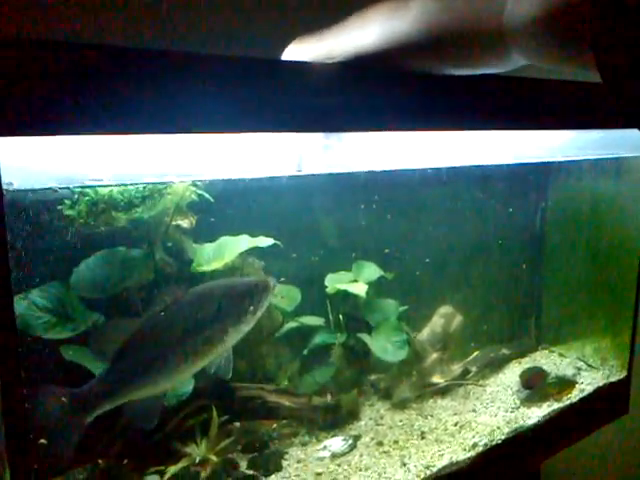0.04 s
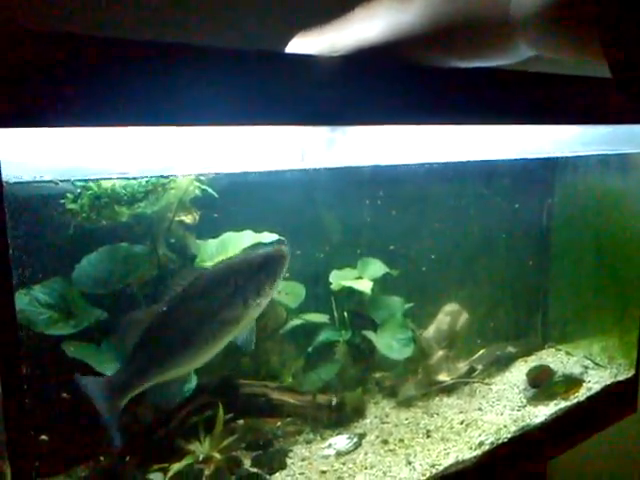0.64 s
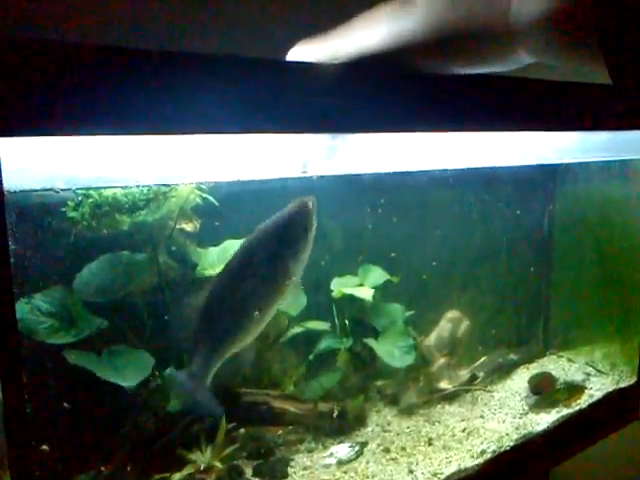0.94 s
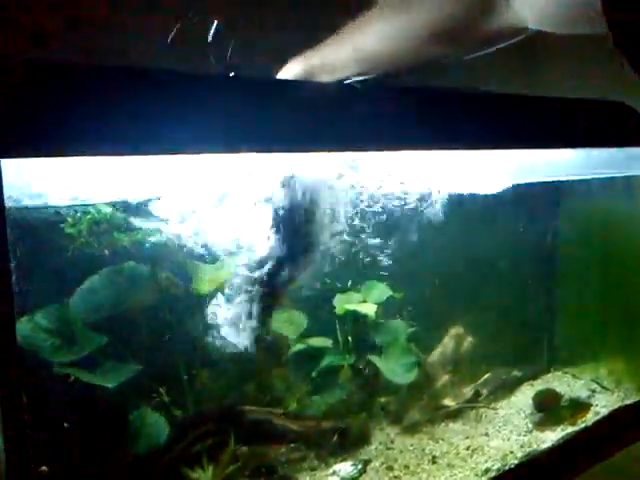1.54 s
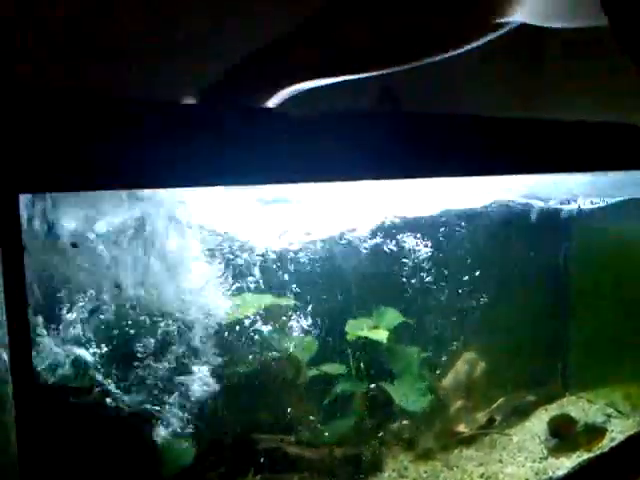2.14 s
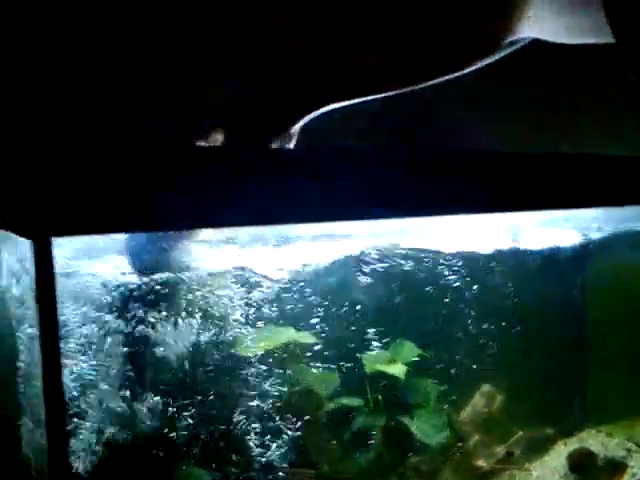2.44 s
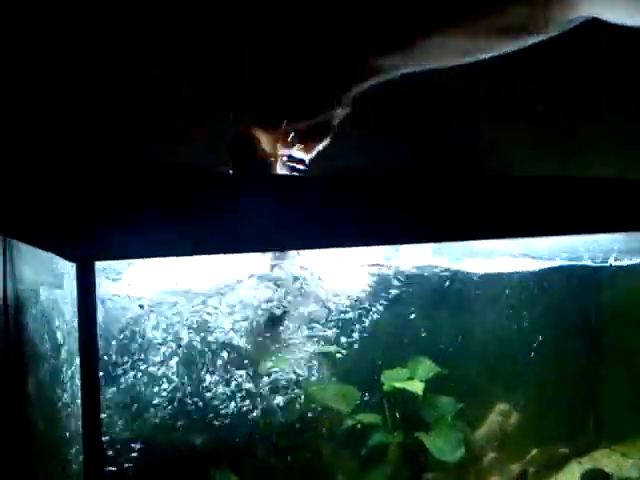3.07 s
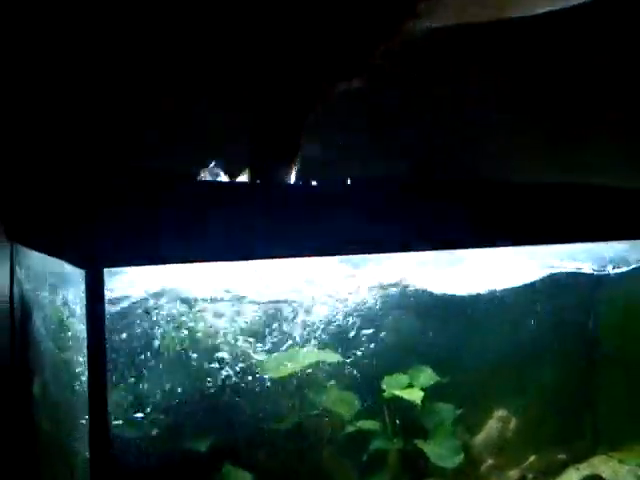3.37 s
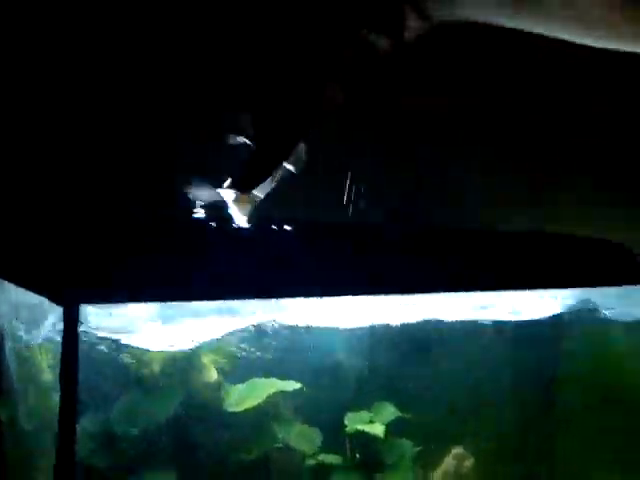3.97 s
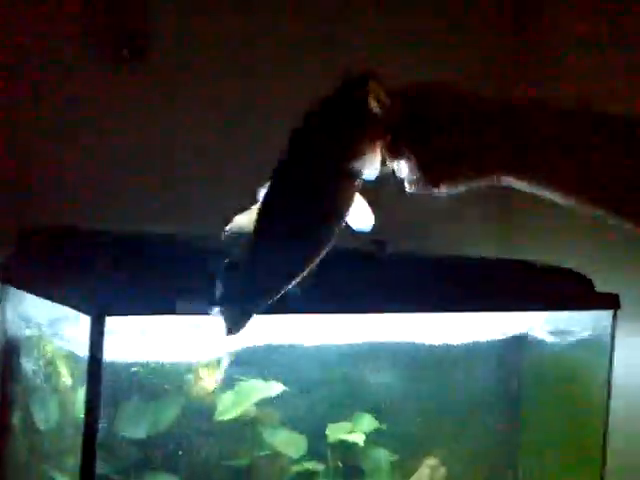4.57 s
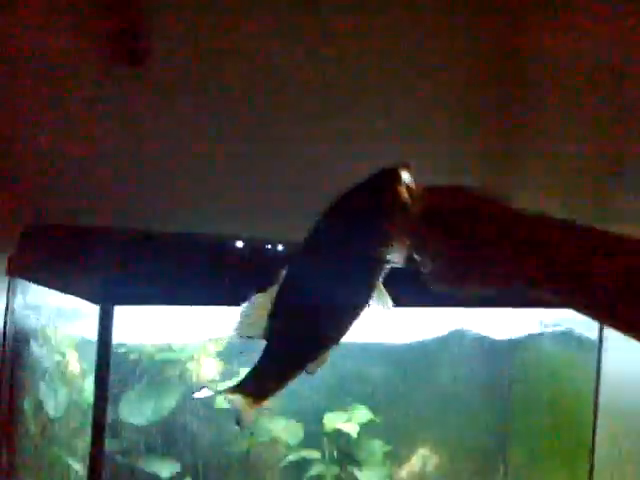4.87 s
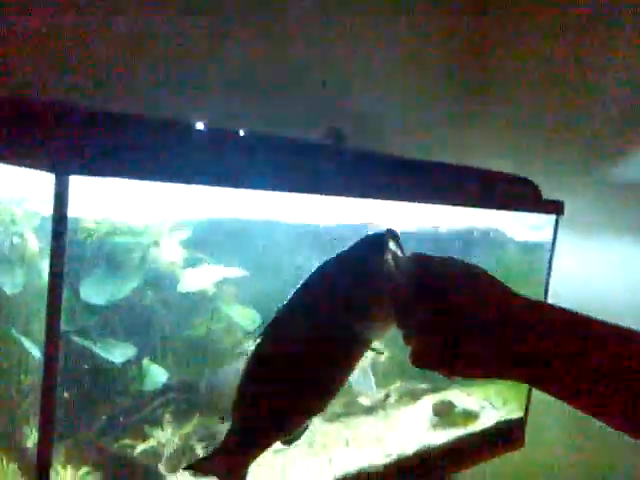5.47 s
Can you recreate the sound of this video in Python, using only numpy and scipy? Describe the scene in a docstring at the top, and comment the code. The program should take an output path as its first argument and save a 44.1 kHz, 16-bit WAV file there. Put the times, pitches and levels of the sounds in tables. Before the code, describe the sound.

A faint aquarium trickle and low room noise are broken by a big fish thrashing at the surface as a hand grabs it. Two loud bouts of slapping splashes throw spray, with deep booming gurgles underneath. The water then settles, and drops plop into the gently sloshing tank as the fish is lifted out. It all happens in a small room, heard through a dull, narrow-band microphone.

```python
"""A big fish, grabbed by hand, thrashes at the surface of an indoor aquarium in two bouts.
Each tail slap throws spray and stirs the tank; the air driven under booms and gurgles.
The water settles, then runs and drips off the lifted fish. A faint trickle and room noise
go on throughout, all heard through a narrow-band microphone."""
import sys
import numpy as np
from scipy import signal
from scipy.fft import rfft, irfft, next_fast_len
from scipy.io import wavfile

SR = 44100
rng = np.random.default_rng(int(sys.argv[2]) if len(sys.argv) > 2 else 0)


def dump_mix(stems):
    """Bounce the given channels to the path in sys.argv[1] as a 16-bit WAV at rate SR."""
    frames = np.atleast_2d(stems).T  # one column per channel
    limited = np.clip(frames, -1, 1)  # hard clip at full scale
    pcm = np.round(limited * 32767).astype(np.int16)
    wavfile.write(sys.argv[1], SR, pcm)


N = 251811


def amp(db):
    """Decibels to gain."""
    return 10 ** (np.asarray(db) / 20)


def unit(x):
    """Scale to rms 1."""
    return x / np.sqrt(np.mean(x ** 2) + 1e-20)


def add(track, start_s, sound):
    """Mix a sound into a track."""
    start = max(0, round(start_s * SR))
    track[start:start + len(sound)] += sound[:len(track) - start]


def filtered(x, gain):
    """Apply a gain given as a function of Hz."""
    size = next_fast_len(len(x) + 8192)
    hz = np.fft.rfftfreq(size, 1 / SR) + 1
    return irfft(rfft(x, size) * gain(hz), size)[:len(x)]


def coloured(x, points):
    """Filter by (Hz, dB) points joined on a log axis."""
    hz, db = np.transpose(points)
    return filtered(x, lambda f: amp(np.interp(np.log(f), np.log(hz), db)))


def plateau(start_s, stop_s, rise_db_per_s, fall_db_per_s):
    """Gain 1 between two times, fading on both sides."""
    t = np.arange(N) / SR
    return amp(-rise_db_per_s * np.maximum(start_s - t, 0) - fall_db_per_s * np.maximum(t - stop_s, 0))


def swell_decay(t, attack_s, t60_s):
    """Quick swell, exponential decay."""
    return (1 - np.exp(-t / attack_s)) * np.exp(-np.log(1000) * t / t60_s)


def ring(t, hz, t60_s, rise, attack_s):
    """Damped sine of a bubble, climbing in pitch as it nears the surface."""
    return np.sin(2 * np.pi * hz * t * (1 + rise * t / t60_s / 2)) * swell_decay(t, attack_s, t60_s)


def swarm(count, low_hz, high_hz, cycles, spread_db, rise):
    """Steady stream of random bubbles, rms 1, summed at quarter rate and upsampled."""
    rate_hz, length = SR / 4, N // 4 + 1
    when, pitch, life, strength = rng.random((count, 4)).T[:, :, None]
    hz = low_hz * (high_hz / low_hz) ** pitch
    t60_s = cycles * (.5 + life) / hz
    steps = np.arange(1000000 // count)
    gain = amp(spread_db * np.minimum(-np.log(1 - strength), np.pi)) * np.sqrt(hz / low_hz)
    waves = gain * ring(steps / rate_hz, hz, t60_s, rise, attack_s=.5 / hz)
    positions = (when * length).astype(int) + steps
    mixed = np.bincount(positions.ravel(), waves.ravel(), length)[:length]
    return unit(irfft(rfft(mixed), 4 * length)[:N])


# Each row: frequency in Hz, relative level in dB.
ROOM_NOISE_HZ_DB = [(25, -23), (80, -14), (130, -2), (220, -1.5), (380, 1.5), (520, -3.5), (750, -9),
                    (1400, -9.5), (2000, -11.5), (2600, -8), (4500, -6.5), (5500, -61)]


def room_noise():
    """Steady noise, strongest in the low mids."""
    return amp(-41.5) * unit(coloured(rng.standard_normal(N), ROOM_NOISE_HZ_DB))


# Each row: centre in seconds, half-width in seconds, rise in dB.
TRICKLE_RISES = [(0.198, 0.059, 5.5), (4.173, 0.098, 2.5)]


def trickle(calm_db=-46.5, foamy_db=-45):
    """Fine bubbles in the tank, a little livelier once the water is foamy."""
    t = np.arange(N) / SR
    fizz = swarm(count=2200, low_hz=1700, high_hz=3418, cycles=140, spread_db=2.5, rise=0.038)
    fizz = unit(filtered(fizz, lambda f: 1 / np.sqrt(1 + (f / 2900) ** 4)))
    thrash_span_s = [THRASH_BOUTS[0][0][0], THRASH_BOUTS[-1][-1][0]]
    level_db = np.interp(t, thrash_span_s, [calm_db, foamy_db])
    level_db += sum(db * np.exp(-((t - s) / half_s) ** 2) for s, half_s, db in TRICKLE_RISES)
    return amp(level_db) * fizz


# Each row: start in seconds, stop in seconds, level in dB.
SLOSH_SPANS = [(0.175, .3, -47.5), (4.516, 5.483, -42)]


def slosh_gain(edge_db_per_s=108):
    """The tank sloshes gently, at first and again as the fish leaves it."""
    return sum(amp(db) * plateau(start_s, stop_s, edge_db_per_s, edge_db_per_s)
               for start_s, stop_s, db in SLOSH_SPANS)


def bubble(hz, t60_s, shake_rad):
    """One air pocket rings, its phase shaken by the moving water."""
    t = np.arange(SR // 3) / SR
    shake = unit(filtered(rng.standard_normal(len(t)), lambda f: np.exp(-f / 70)))
    shaken_t = np.abs(t + shake_rad * shake / (2 * np.pi * hz))
    return ring(shaken_t, hz, t60_s, rise=.1, attack_s=0.0028)


# Each row: start in seconds, pitch in Hz, relative level in dB, t60 in seconds.
AIR_POCKETS = [(.205, 363, -35, .15), (.261, 333, -38, 0.17), (0.391, 2740, -27, 0.036),
               (.421, 2130, -32.5, 0.07), (1.139, 190.3, -15, 0.2), (1.147, 2210, -16.5, 0.11),
               (1.18, 195, -4, 0.055), (1.204, 169, -14.5, .14), (1.244, 1030, -12.5, 0.13),
               (1.252, 1514, -13, 0.056), (1.256, 1760, -15, 0.079), (1.293, 870, -12.5, 0.15),
               (1.335, 478, -13, 0.084), (1.39, 194.4, -14, 0.21), (1.394, 1230, -11, 0.11),
               (1.528, 1092, -8.5, 0.095), (1.536, 1394, -5.5, 0.06), (1.539, 156, -17, 0.14),
               (1.635, 522, -12.5, 0.057), (1.739, 189.7, -18.5, 0.12), (1.747, 586, -19, 0.13),
               (1.916, 199.8, -6.5, .12), (2.041, 1433, -13.5, .11), (2.102, 863, -10, 0.063),
               (2.146, 197, -10, .11), (2.163, 2460, -10, 0.045), (2.175, 501, -5.5, 0.055),
               (2.187, 283.6, -10, 0.081), (2.283, 235, -5, 0.074), (2.293, 471, -9.5, 0.053),
               (2.3, 158.6, -7.5, .083), (2.37, 422.3, -14, 0.2), (2.403, 413.4, -11.5, 0.13),
               (2.413, 205, -11, .17), (2.484, 324, -10, .069), (2.51, 439, -7.5, 0.044),
               (2.523, 545, -15, 0.075), (2.606, 324, -21.5, 0.088), (2.645, 562, -26, 0.062),
               (2.691, 499, -8, 0.045), (2.698, 207.4, -8, 0.11), (2.711, 476, -3.5, 0.076),
               (2.724, 215, -10, 0.096), (2.811, 452, -6.5, 0.065), (2.869, 459, -6.5, .07),
               (2.872, 166.4, -16, 0.056), (2.894, 149.8, -15.5, 0.2), (2.955, 468, -12.5, 0.058),
               (2.998, 682, -13.5, 0.099), (3.045, 2430, -14.5, 0.11), (3.054, 1109, -8, 0.051),
               (3.06, 211.5, -13.5, 0.11), (3.146, 1116, -13.5, 0.12), (3.253, 2700, -11, .05),
               (3.257, 1142, -10, 0.062), (3.352, 560, -13, 0.074), (3.481, 453.4, -17.5, 0.18),
               (3.526, 476, -18.5, 0.16), (3.638, 2170, -21.5, .068), (3.695, 254.5, -24.5, 0.11),
               (3.779, 2343, -25.5, 0.064)]


def air_pockets():
    """A few bubbles ring as the tank first sloshes; later, air driven under by the fish rings out."""
    out = np.zeros(N)
    for start_s, hz, db, t60_s in AIR_POCKETS:
        add(out, start_s, amp(db + 1.5) * bubble(hz, t60_s, shake_rad=0.46))
    return out


def patter(size, per_s, spread_db):
    """Dense droplet impacts of uneven size, rms 1."""
    hits = rng.random(size) < per_s / SR
    return unit(hits * rng.standard_normal(size) * amp(spread_db * rng.standard_normal(size)))


def splash(hz, attack_s, t60_s, octaves=1.63, skirt_db=-19):
    """Fading burst of droplets: a broad spectral hump on a faint skirt."""
    t = np.arange(SR // 3) / SR
    hump = lambda f: np.exp(-(np.log2(f / hz) / octaves) ** 2)
    skirt = lambda f: amp(skirt_db) * np.exp(-f / 6000) * f / (f + 200)
    droplets = filtered(patter(len(t), per_s=7000, spread_db=0), lambda f: hump(f) + skirt(f))
    return unit(droplets) * swell_decay(t, attack_s, t60_s)


# Each row: start in seconds, relative splash level in dB, t60 in seconds, centre in Hz, surge in dB.
TAIL_SLAPS = [(1.143, -20, 0.3, 2500, -19.5), (1.25, -24.5, .12, 1400, -34),
              (1.274, -16.5, .18, 1000, -31.5), (1.335, -20.5, .15, 2000, -19),
              (1.392, -22.5, 0.7, 1200, -24), (1.51, -20.5, 0.71, 1040, -16),
              (1.538, -15.5, 0.67, 1406, -15.5), (1.63, -16.5, 0.14, 1700, -24.5),
              (1.733, -14.5, .11, 950, -21.5), (1.907, -14, 0.16, 1910, -22),
              (1.944, -8.5, 0.12, 1730, -22), (2.028, -13.5, 0.22, 1400, -24),
              (2.099, -21, 0.24, 1700, -39), (2.139, -17.5, 0.3, 1500, -26.5),
              (2.163, -10, .09, 1890, -19.5), (2.221, -17.5, 0.066, 1076, -28),
              (2.286, -15.5, 0.11, 820, -14.5), (2.318, -8, 0.096, 1970, -19.5),
              (2.4, -23, 0.1, 1390, -21.5), (2.647, -50, .2, 700, -35), (2.692, -21, 0.091, 583, -13.5),
              (2.709, -18, 0.24, 1410, -19), (2.81, -26, 0.49, 1000, -32), (2.87, -28, 0.1, 1500, -22.5),
              (2.95, -17, 0.43, 700, -21.5), (2.977, -17, 0.15, 1680, -22),
              (2.998, -16.5, 0.13, 1200, -28.5), (3.044, -10.5, 0.15, 2000, -20.5),
              (3.146, -17, 0.16, 1280, -19.5), (3.253, -14, 0.34, 1800, -16.5),
              (3.399, -27, 0.098, 1220, -43), (3.478, -23.5, 0.35, 1980, -24.5)]


def slaps():
    """The tail and falling water hit the surface; longer splashes swell more slowly."""
    out = np.zeros(N)
    for start_s, db, t60_s, hz, _ in TAIL_SLAPS:
        add(out, start_s, amp(db + 1.5) * splash(hz, attack_s=0.027 * t60_s, t60_s=t60_s))
    return out


def surge_power():
    """Every slap and drop stirs the tank for a moment; the powers add."""
    power, t = np.zeros(N), np.arange(SR // 2) / SR
    stirs = [(s, db) for s, *_, db in TAIL_SLAPS] + [(s, db - 10) for s, db, *_ in FALLING_DROPS]
    for start_s, db in stirs:
        add(power, start_s, (amp(db) * swell_decay(t, attack_s=0.0063, t60_s=0.43)) ** 2)
    return power


# One list per bout. Each row: time in seconds, relative spray level in dB, relative churn level in dB.
THRASH_BOUTS = [
    [(1.25, -34, -25), (1.316, -26.5, -26.5), (1.412, -23, -29.5), (1.538, -25, -28.5),
     (1.752, -28.5, -28.5), (1.972, -25, -25.5), (2.108, -21, -33.5), (2.264, -25, -22),
     (2.376, -27.5, -24), (2.486, -36, -31), (2.58, -41.5, -37)],
    [(2.7, -36, -20), (2.746, -35.5, -34), (2.874, -31, -25), (3.15, -26, -26), (3.42, -30.5, -28.5),
     (3.53, -30, -37), (3.642, -32, -41.5), (3.746, -36.5, -40.5), (3.84, -57, -52)],
]


def thrash_gains(rise_db_per_s=400):
    """The fish throws spray and stirs the tank; the spray dies away sooner."""
    t = np.arange(N) / SR
    thrown, stirred = np.zeros((2, N))
    for bout in THRASH_BOUTS:
        s, spray_db, churn_db = np.transpose(bout)
        thrown += amp(np.interp(t, s, spray_db)) * plateau(s[0], s[-1], rise_db_per_s, 261.5)
        stirred += amp(np.interp(t, s, churn_db)) * plateau(s[0], s[-1], rise_db_per_s, 155.5)
    return thrown, stirred


# Each row: frequency in Hz, relative level in dB. The tank booms near 200 and 450 Hz.
CHURN_HZ_DB = [(25, -31.5), (70, -10.5), (110, -17.5), (150, -8), (200, -0.5), (245, -6), (300, -2.5),
               (350, -11), (440, 0), (570, -2), (760, -9.5), (1200, -16.5), (2500, -50.5)]


def churn(stirred):
    """Large bubbles gurgle over a wash of noise as the tank is stirred."""
    gurgle = swarm(count=1200, low_hz=240.8, high_hz=907, cycles=35, spread_db=3.5, rise=.2)
    gurgle = unit(coloured(gurgle, CHURN_HZ_DB))
    wash = unit(coloured(rng.standard_normal(N), CHURN_HZ_DB))
    power = (amp(-.5) * stirred) ** 2 + slosh_gain() ** 2 + surge_power()
    return np.sqrt(power) * unit(gurgle + amp(2) * wash)


# Each row: frequency in Hz, relative level in dB.
SPRAY_HZ_DB = [(200, -34.5), (600, -3.5), (900, 0.5), (1150, -1), (1350, -1.5), (1900, -1.5), (2450, -1),
               (4500, -9.5)]


def spray(thrown):
    """Water thrown up, or running off the fish, patters back and leaves a fizz of small bubbles."""
    fizz = swarm(count=3200, low_hz=684.7, high_hz=3684, cycles=49, spread_db=3.5, rise=0.18)
    droplets = amp(4) * patter(N, per_s=7000, spread_db=-2.5)
    gain = amp(1) * thrown + amp(-45.5) * runoff_gain()
    return gain * unit(coloured(fizz + droplets, SPRAY_HZ_DB))


# Each row: time in seconds, nominal peak in dB.
OVERLOAD_CLICKS = [(1.5429, -11.5), (1.5502, -29), (2.3229, -13), (2.328, -26)]


def overload_clicks(corner_hz=3000):
    """Thin, bright clicks as the recorder overloads on two hard splashes."""
    clicks = np.zeros(N)
    for s, db in OVERLOAD_CLICKS:
        clicks[round(s * SR)] = amp(db) * SR / (np.pi * corner_hz)
    return filtered(clicks, lambda f: 1 / (1 + (f / corner_hz) ** 2))


# Each row: start in seconds, impact level in dB, bubble pitch in Hz, bubble level in dB.
FALLING_DROPS = [(3.929, -30.5, 403, -21.5), (3.962, -54, 454, -23.5), (4.038, -42, 552, -27),
                 (4.203, -41.5, 1940, -30), (4.254, -49, 608, -27.5), (4.375, -41, 534, -28),
                 (4.491, -32, 380, -25), (4.58, -53, 2680, -23.5), (4.695, -35, 1286, -28),
                 (4.887, -34, 305, -17), (5.044, -41, 3090, -23.5), (5.174, -25.5, 345, -11),
                 (5.194, -21, 332, -13), (5.297, -26.5, 304, -16.5), (5.376, -27, 383, -19.5),
                 (5.422, -36.5, 3310, -22.5)]


def drips(shake_rad=0.95):
    """Each drop hits the surface, opens a crater that thuds, and traps one bubble."""
    out = np.zeros(N)
    for start_s, impact_db, hz, bubble_db in FALLING_DROPS:
        impact = amp(impact_db) * splash(hz=1165, attack_s=0.0013, t60_s=0.089)
        thud = amp(impact_db - 12) * bubble(hz=144.2, t60_s=0.54, shake_rad=shake_rad)
        plink = amp(bubble_db) * bubble(hz, t60_s=0.081, shake_rad=shake_rad)
        add(out, start_s, impact + thud + plink)
    return out


def runoff_gain():
    """The flow off the lifted fish swells, holds briefly and thins out."""
    return plateau(start_s=4.88, stop_s=4.93, rise_db_per_s=33.5, fall_db_per_s=33.5)


def stream(centre_hz=1425, width_hz=140):
    """The thin stream off the fish makes bubbles of nearly one size."""
    band = lambda f: np.exp(-((f - centre_hz) / width_hz) ** 2)
    return amp(-44) * runoff_gain() * unit(filtered(patter(N, per_s=860, spread_db=3), band))


def reverb(x, t60_s=0.41, gap_s=0.0075):
    """A small furnished room answers after a short gap."""
    t = np.arange(SR // 2) / SR
    tail = rng.standard_normal(len(t)) * np.exp(-np.log(1000) * t / t60_s) * (t > gap_s)
    return signal.fftconvolve(x, tail / np.linalg.norm(tail))[:N]


def scene():
    """The water in its room, over the trickle and room noise."""
    thrown, stirred = thrash_gains()
    water = spray(thrown) + churn(stirred) + slaps() + air_pockets() + drips() + stream()
    return (water + amp(-10.5) * reverb(water) + trickle() + room_noise())[None]


# Each row: frequency in Hz, microphone gain in dB.
MICROPHONE_HZ_DB = [(25, -6.5), (140, 0.5), (2500, 1), (2850, -3.5), (3250, -4.5), (3600, -12.5),
                    (4000, -21), (4350, -34), (4650, -57.5), (5200, -100)]


def record(dry, ceiling=0.64, top_hz=16000):
    """Soft clip, then a narrow band; only the overload clicks reach above it."""
    clipped = dry[0] / (1 + np.abs(dry[0] / ceiling) ** 6) ** (1 / 6)
    return filtered(coloured(clipped, MICROPHONE_HZ_DB) + overload_clicks(), lambda f: f < top_hz)[None]


dry = scene()
out = record(dry)
dump_mix(out)
```